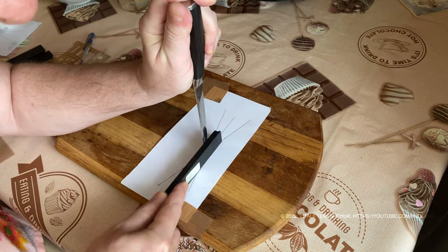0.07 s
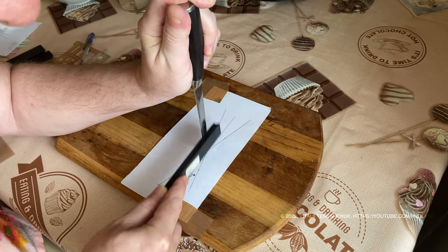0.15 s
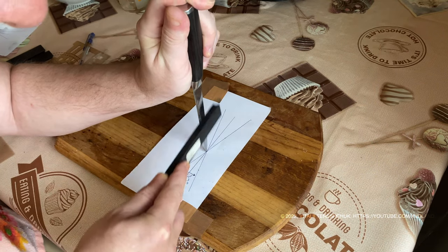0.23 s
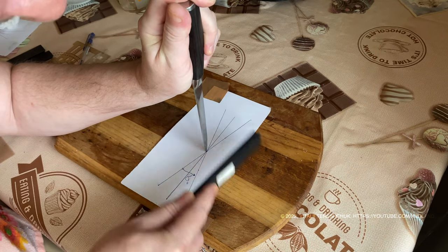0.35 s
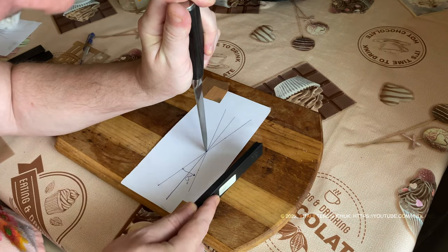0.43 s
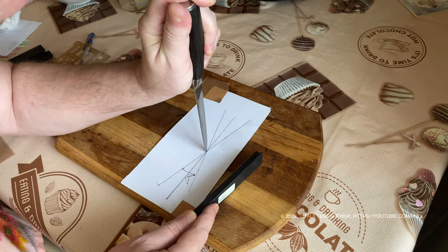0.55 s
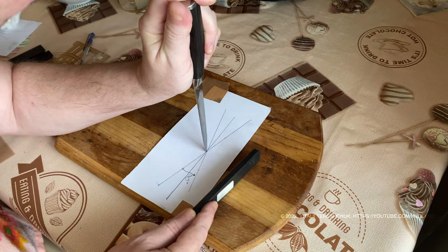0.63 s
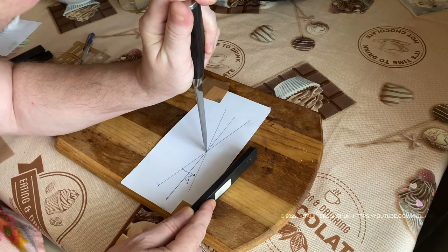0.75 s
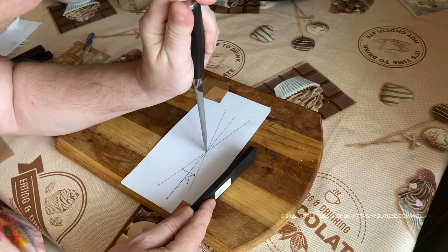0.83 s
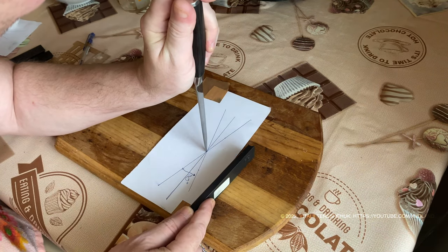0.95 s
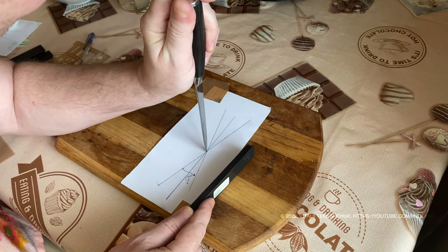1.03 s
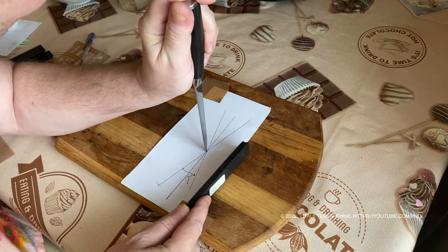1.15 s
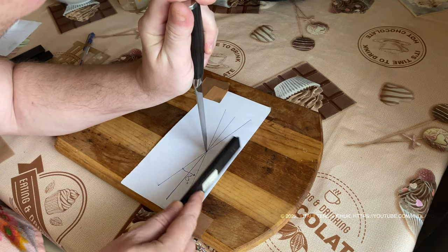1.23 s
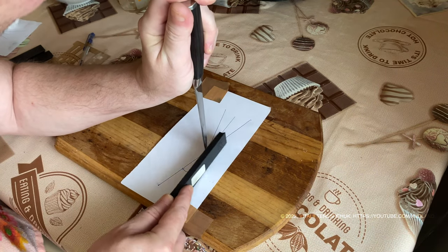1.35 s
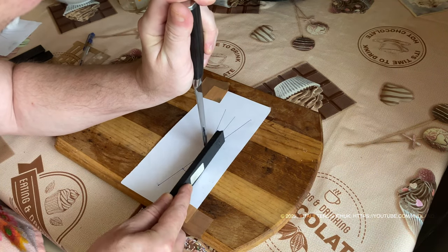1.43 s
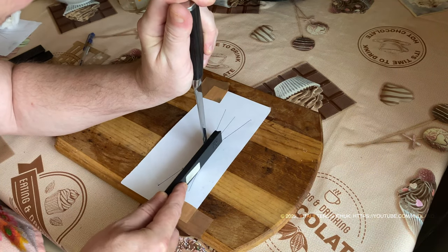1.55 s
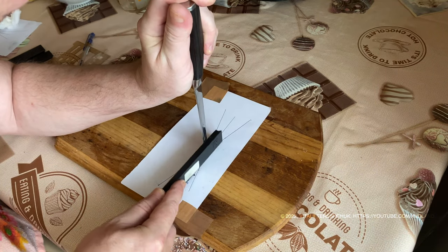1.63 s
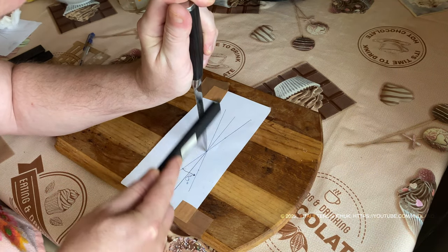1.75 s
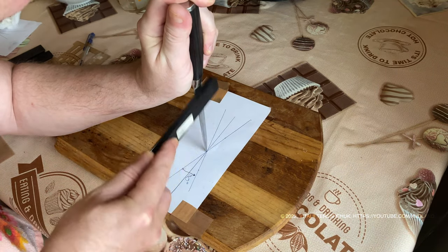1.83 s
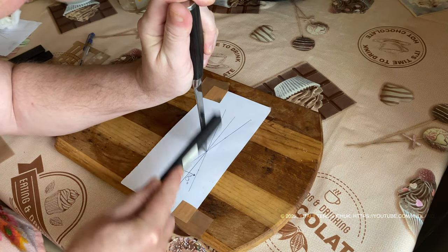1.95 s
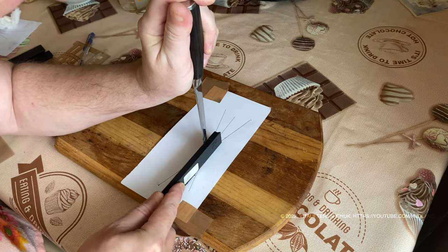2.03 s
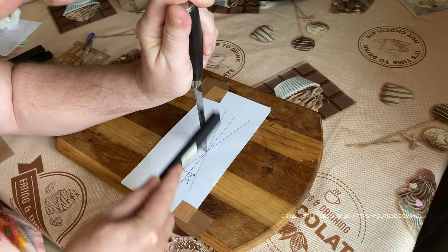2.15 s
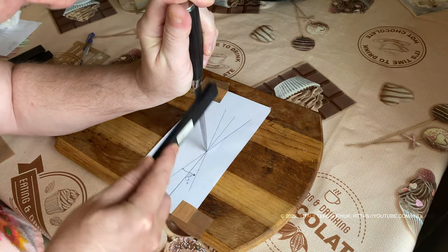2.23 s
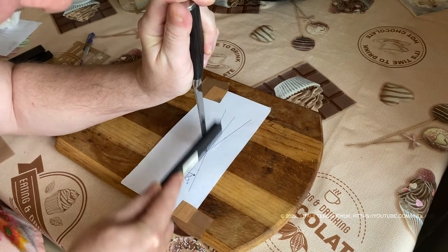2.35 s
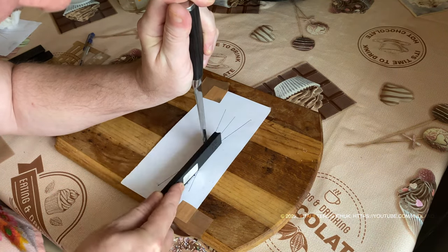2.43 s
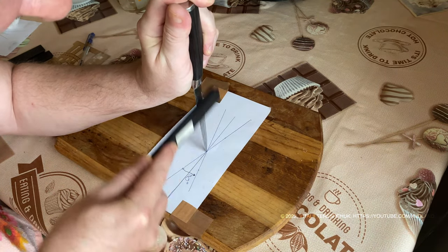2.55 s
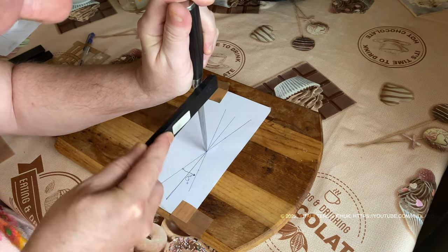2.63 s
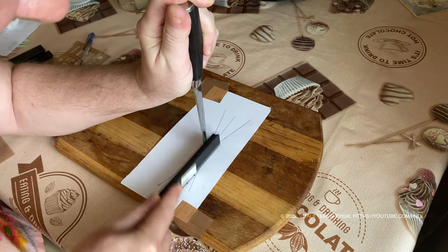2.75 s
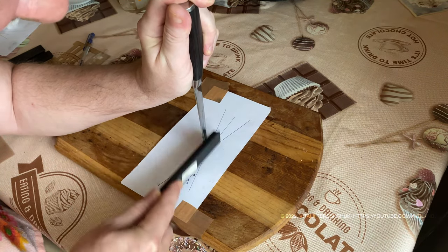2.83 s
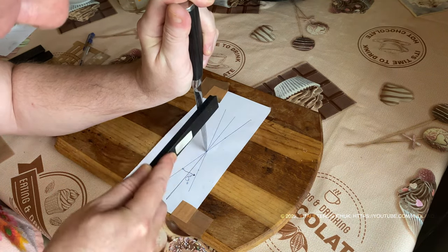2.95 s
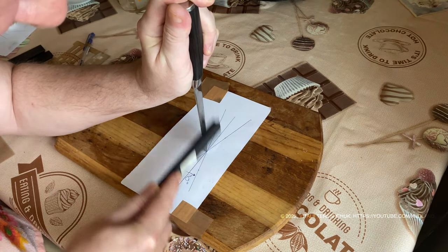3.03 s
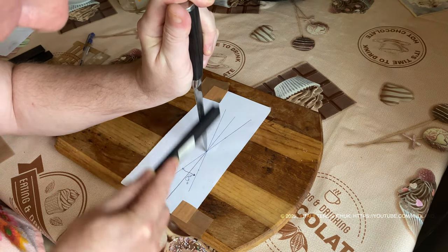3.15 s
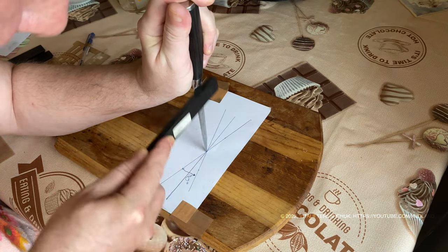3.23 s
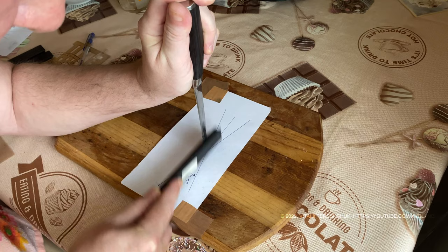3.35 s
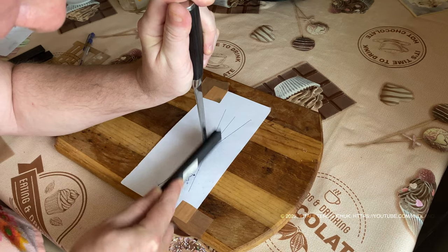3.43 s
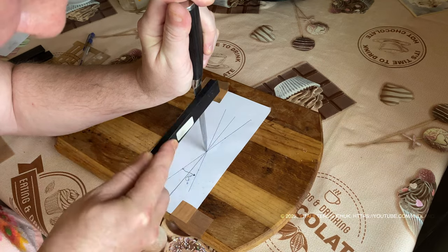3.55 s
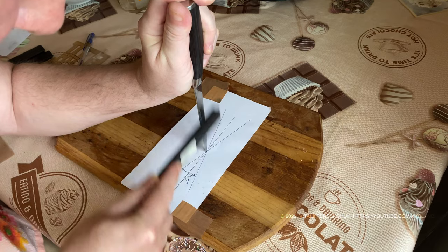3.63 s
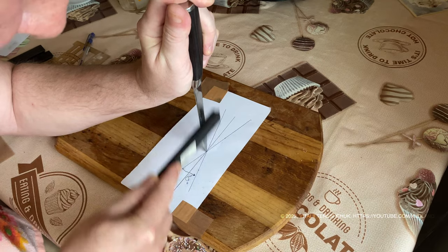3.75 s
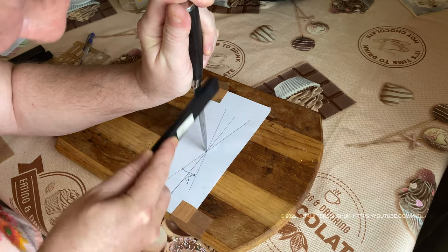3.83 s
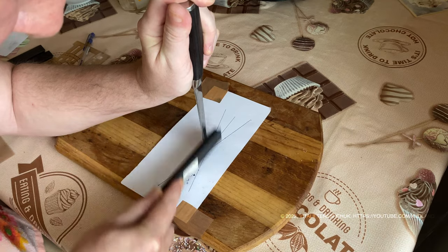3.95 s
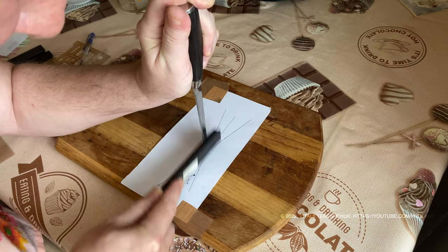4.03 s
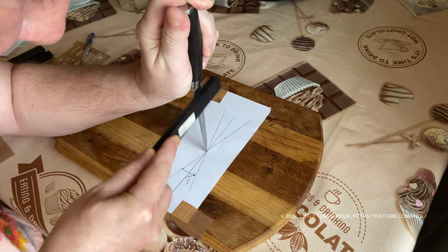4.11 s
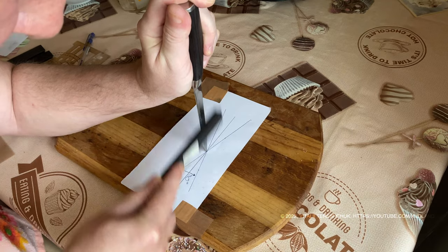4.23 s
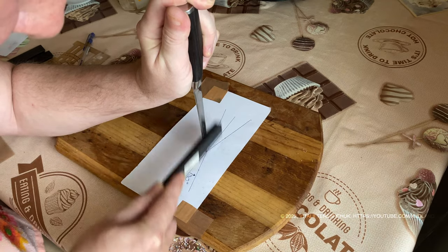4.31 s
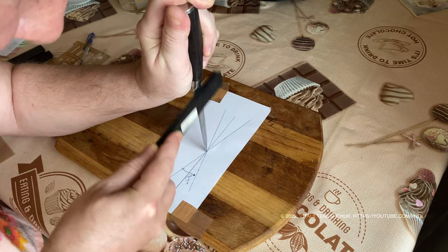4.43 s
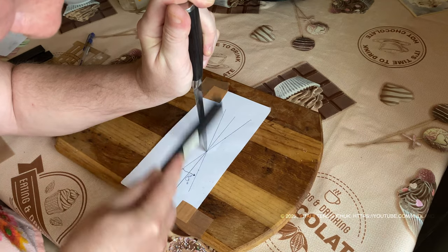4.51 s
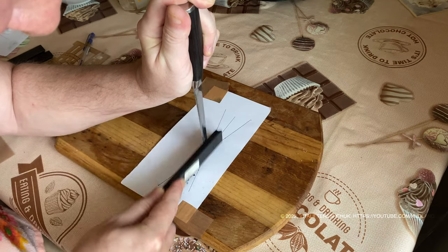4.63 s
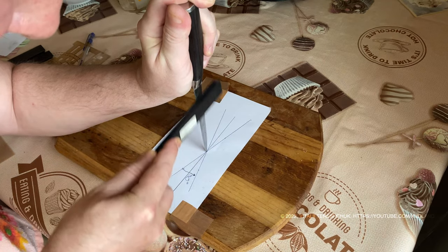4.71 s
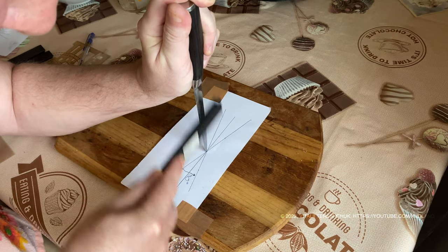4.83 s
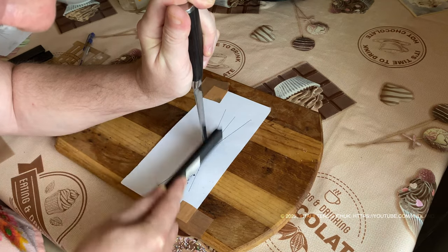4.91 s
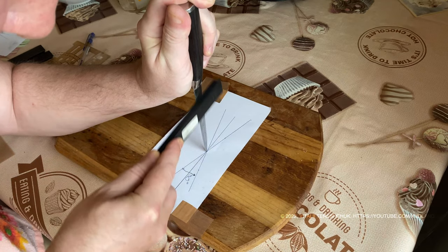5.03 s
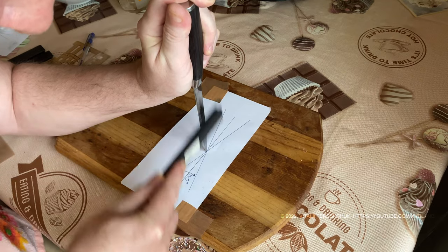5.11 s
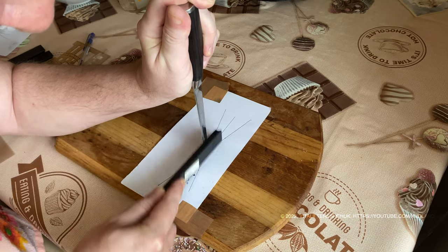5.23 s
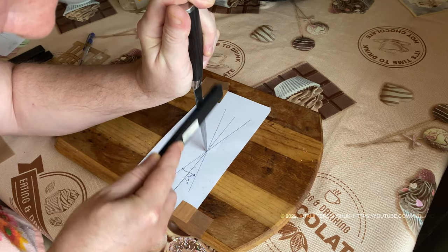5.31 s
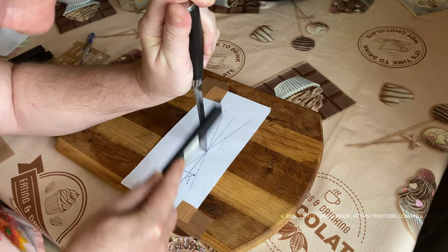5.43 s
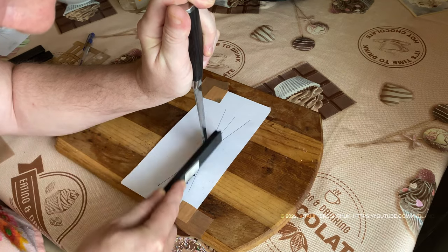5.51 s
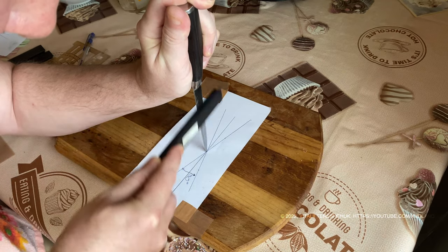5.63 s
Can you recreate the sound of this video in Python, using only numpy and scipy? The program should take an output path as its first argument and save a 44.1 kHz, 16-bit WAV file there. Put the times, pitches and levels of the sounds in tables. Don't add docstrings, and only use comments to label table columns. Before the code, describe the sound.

A gritty bar is worked along a steel blade whose tip rests on a wooden board. First two isolated knocks and a light brush, a pause, then a small touch and click; steady quick scraping follows to the end, bright hiss over low wooden rumble, punctuated by dry knocks about every 0.3 s. Softer taps come on some returns. Near stereo microphone, small room, light background air.

```python
import sys
import numpy as np
from scipy import signal
from scipy.fft import rfft, irfft, next_fast_len
from scipy.io import wavfile
from scipy.ndimage import uniform_filter1d

SR = 44100
rng = np.random.default_rng(int(sys.argv[2]) if len(sys.argv) > 2 else 0)


def wav_out(sig):
    wavfile.write(sys.argv[1], SR, np.round(np.clip(np.atleast_2d(sig).T, -1, 1) * 32767).astype(np.int16))


def natural_amplitude(level_db):
    exponent = np.asarray(level_db, float) / 20
    return 10 ** exponent


N = 250047

# (time [s], blow [dB], bar ring [dB], sharp tick [dB], dull side of the board [dB])
KNOCK_EVENTS = [(0.014, -9.5, -17.5, -20, -15.5), (0.484, -18.5, -33, -20.5, -7),
                (1.307, -26.5, 14.5, -47, 14), (1.445, -37, -21, -2, -20), (1.963, -6.5, -22.5, -18, -21),
                (2.348, -4, -28, -14, -26), (2.723, -1, -23.5, -16.5, -24.5),
                (3.012, -8, -11.5, -17, -13.5), (3.333, -6.5, -27, -18, -24),
                (3.634, -11.5, -16, -18.5, -14.5), (3.931, -11.5, -11, -18.5, -14),
                (4.224, -7, -18.5, -17.5, -11.5), (4.536, -10.5, -7.5, -16, -12.5),
                (4.829, -4.5, -18.5, -13.5, -16.5), (5.132, -14.5, -12, -20.5, -12),
                (5.438, -10, -4.5, -17, -7)]


def evened(x):
    return x / np.sqrt(np.mean(x ** 2) + 1e-20)


def smoothed(x, size):
    return uniform_filter1d(uniform_filter1d(x, size), size)


def read(points, hz):
    f, value = np.transpose(points)
    return np.interp(np.log(hz + 1), np.log(f + 1), value)


def coloured(x, gain):
    size = next_fast_len(x.shape[-1])
    return irfft(rfft(x, size) * gain(np.fft.rfftfreq(size, 1 / SR)), size)[..., :x.shape[-1]]


def add(mix, s, sound):
    part = mix[:, round(s * SR):][:, :sound.shape[1]]
    part += sound[:, :part.shape[1]]


def rings(modes, t, luck_db):
    out = 0 * t
    for (hz, db, t60_s), d in zip(modes, luck_db):
        out = out + natural_amplitude(db + d - 60 * t / t60_s) * np.sin(2 * np.pi * hz * t)
    return out


def peaks(modes, hz):
    return sum(natural_amplitude(db) / (1 + 2j * (hz - f) / width_hz) for f, width_hz, db in modes)


def resonate(x, hz, width_hz):
    turn = np.exp(2j * np.pi * np.cumsum(hz) / SR)
    r = np.exp(-np.pi * width_hz / SR)
    return 2 * (turn * signal.lfilter([1 - r], [1, -r], x / turn)).real


def alike(pair, same):
    def share(hz):
        return np.clip(read(same, hz), -1, 1)
    shared = coloured(pair[0], share)
    own = coloured(pair[1], lambda hz: np.sqrt(1 - share(hz) ** 2))
    return np.array([pair[0], shared + own])


def patchy(x, depth_db):
    z = signal.stft(x, nperseg=512, noverlap=384)[2]
    patches = uniform_filter1d(rng.standard_normal(z.shape[-2:]), size=6, axis=0)
    patches = evened(uniform_filter1d(patches, size=14, axis=1))
    return signal.istft(z * natural_amplitude(depth_db * patches), nperseg=512, noverlap=384)[1][..., :N]


def air():
    # (frequency [Hz], density [dB per Hz])
    air_spectrum = [(15, -43), (25, -10.5), (54, -10), (140, -12.5), (171, -14.5), (340, -15.5), (366, -18),
                    (1030, -15), (1190, -20.5), (1490, -22.5), (3120, -34.5), (4740, -29), (8500, -44),
                    (10500, -47), (12300, -91.5), (19800, -120)]
    # (frequency [Hz], left-right likeness [-1 to 1])
    air_same = [(90, 1), (250, 0.82), (400, 0.26), (600, -0.56), (1500, -0.41), (4000, -0.11),
                (8000, -0.016)]
    # (time [s], floor level [dB])
    hush = [
        (0, 1),
        (1.47, -2),
        (1.57, -7),
        (1.9, -8.5),
        (2.3, 4),
        (5.67, 0),
    ]
    pair = alike(rng.standard_normal((2, N)), air_same)
    pair = np.array([patchy(channel, 1.2) for channel in pair])
    hush_db = np.interp(np.arange(N) / SR, *np.transpose(hush))
    return natural_amplitude(-60 + hush_db) * evened(coloured(pair, lambda hz: natural_amplitude(read(air_spectrum, hz))))


def room(x):
    # (frequency [Hz], decay t60 [s])
    room_t60 = [(100, 0.584), (300, 0.47), (700, 0.27), (1800, 0.24), (5000, 0.23), (11000, 0.062)]
    # (frequency [Hz], left-right likeness [-1 to 1])
    room_same = [(60, .97), (250, .65), (500, .1), (1500, .35), (4000, .05), (8000, .6), (10000, .95),
                 (12000, .7)]
    echoes = np.zeros((2, SR // 2))
    at = np.arange(300, SR // 2 - 20, 20) + rng.integers(0, 20, (2, (SR // 2 - 301) // 20))
    np.put_along_axis(echoes, at, rng.choice([-1., 1.], at.shape), 1)
    hz, t, z = signal.stft(alike(echoes, room_same), SR, nperseg=256)
    decay = natural_amplitude(-60 * t / read(room_t60, hz)[:, None])
    tail = signal.istft(z * decay, SR, nperseg=256)[1]
    tail = tail / np.linalg.norm(tail, axis=1, keepdims=True)
    return signal.fftconvolve(x[None], tail, axes=1)[:, :N]


def chattered(ring, strengths, luck):
    chatter = np.zeros(500)
    contacts_s = np.abs([0, .0013, .0031, .0052, .0082] + .00015 * luck[:5])
    chatter[np.round(contacts_s * SR).astype(int)] = strengths
    push = np.convolve(chatter, signal.windows.hann(14))
    return signal.oaconvolve(ring, np.diff(push))[:len(ring)]


def tap(db, luck):
    # (frequency [Hz], level [dB], decay t60 [s])
    handle_modes = [(597, 3, 0.045), (740, 5, 0.061), (776, 5.5, 0.028), (831, 9.5, 0.041),
                    (890, -40, 0.025), (1285, 5, 0.022), (1442, -1.5, 0.066), (1670, -9, 0.11),
                    (2000, -39, 0.024), (2600, -33, 0.046)]
    ring = rings(handle_modes, np.arange(SR // 4) / SR, 1.6 * luck)
    wood = chattered(ring, [0.23, 0.81, 0.33, 0.028, 0.14], luck)
    wood = coloured(wood, lambda hz: 1 / (1 + 1j * hz / 1900) ** 2)
    return natural_amplitude(db + 4.5) * np.array([wood / abs(wood).max(), 0 * wood])


def knock(blow_db, bar_db, tick_db, dull_db, luck):
    # (frequency [Hz], level [dB], decay t60 [s])
    board_modes = [(576, -27, 0.051), (594, -23.5, 0.041), (700, -23.5, 0.042), (840, -6, 0.018),
                   (852, 13, 0.032), (925, 8.5, 0.029), (930, -27, 0.0034), (1093, -18.5, 0.024),
                   (1247, 0, 0.033), (1340.4, 7.5, 0.021), (1552, -54, 0.0083), (1812, -15.5, .03),
                   (1968, -8, 0.015), (2236, -39.5, 0.0055), (2640, -59.5, 0.016), (2556, -16.5, 0.0065)]
    # (frequency [Hz], level [dB], decay t60 [s])
    bar_modes = [(1469, 0, .105), (1506, -7, .06)]
    # (frequency [Hz], level [dB], decay t60 [s])
    table_modes = [(70.8, 0, 0.2), (57.8, -16, 0.059), (91, -3, 0.21), (114.4, 4.5, 0.1), (179.8, -9, 0.36),
                   (220.2, 0, 0.12), (305.3, -1.5, 0.058), (376, -2, 0.032)]
    # (frequency [Hz], density [dB per Hz])
    tick_spectrum = [(1500, -30.5), (2500, -12), (3000, -10.5), (4200, -4), (5200, -13.5), (7000, -20),
                     (9000, -16), (11500, -31.5), (12800, -42.5), (16000, -86.5)]
    t = np.arange(SR // 3) / SR
    noise = rng.standard_normal(len(t))
    waver = natural_amplitude(3.0 * evened(smoothed(noise, 200)))

    count = len(board_modes)
    modes = np.array(board_modes)
    low = 1 / (1 + np.exp((modes[:, 0] - 976) / 400))
    modes[:, 0] *= 1 + .02 * luck[-count:]
    board = waver * rings(modes, t, 2.6 * luck[:count] + 1.77 * (dull_db + 10.5) * low)
    wood = chattered(board, [.35, .85, 1., .6, .3], luck)

    grip = natural_amplitude(-450 * np.maximum(t - .035, 0))
    bar = waver[::-1] * rings(bar_modes, t, luck) * grip
    wood += natural_amplitude(bar_db + 17.5) * chattered(bar, [0, 1., 0, 0, 0], luck)

    burst = noise * natural_amplitude(-60 * t / 0.027) * np.minimum(t / 0.0019, 1)
    tick = coloured(burst, lambda hz: natural_amplitude(read(tick_spectrum, hz))) * (t < t[-1] / 2)
    sharp = wood / abs(wood).max() + natural_amplitude(tick_db + 4.5) * tick / abs(tick).max()

    thump = 0 * t
    for mode, d in zip(table_modes, luck[::-1]):
        build = 1 - np.exp(-(t * mode[0] / 1.15) ** 2)
        thump += rings([mode], t, [2.0 * d]) * build
    thump_db = -30 - 0.44 * min(dull_db + 14, 0)
    return natural_amplitude(blow_db + 1.0) * np.array([sharp, natural_amplitude(thump_db) * thump])


def knocks():
    # (time [s], level [dB])
    tap_events = [
        (1.802, -37),
        (2.548, -19),
        (3.195, -25),
        (4.126, -43.5),
        (4.397, -23.5),
        (5.354, -43),
        (2.715, -25),
        (3.925, -32),
        (5.126, -40),
    ]
    out = np.zeros((2, N))
    luck = rng.standard_normal((len(KNOCK_EVENTS) + len(tap_events), 24))
    for (s, *blow), row in zip(KNOCK_EVENTS, luck):
        add(out, s - .0015, knock(*blow, row))
    for (s, db), row in zip(tap_events, luck[len(KNOCK_EVENTS):]):
        add(out, s - .0015, tap(db, row))
    return out


def arch(t, start_s, length_s, top):
    u = np.clip((t - start_s) / length_s, 0, 1)
    return np.sin(np.pi * u ** (np.log(.5) / np.log(top))).clip(0)


def hand():
    # (start [s], length [s], top speed [dB], pressure [dB])
    pushes = [(-.06, .09, -50.5, -44.5), (1.55, 0.17, -61.5, -61.5), (1.84, 0.14, -50.5, -54),
              (2.22, .15, -50.5, -57.5), (2.6, 0.13, -48.5, -61), (2.93, 0.1, -46, -48),
              (3.23, .13, -47.5, -50.5), (3.52, 0.14, -51, -54.5), (3.81, 0.15, -49.5, -55.5),
              (4.11, .15, -48, -52.5), (4.43, 0.12, -48, -52.5), (4.73, 0.13, -43.5, -53.5),
              (5.02, 0.13, -47.5, -54.5), (5.33, .14, -47, -53.5), (5.64, .14, -46, -50)]
    # (start [s], length [s], top speed [dB], pressure [dB])
    pulls = [(1.69, 0.13, -58, -65.5), (2.04, 0.19, -55.5, -71), (2.4, 0.22, -55, -63),
             (2.77, 0.14, -56.5, -60), (3.05, 0.17, -53.5, -54), (3.37, .15, -53, -59.5),
             (3.66, .15, -49.5, -62.5), (3.96, 0.16, -48.5, -55), (4.27, 0.14, -46.5, -54.5),
             (4.58, 0.14, -50.5, -54), (4.87, 0.14, -49.5, -58.5), (5.18, 0.13, -49, -57.5),
             (5.47, .17, -52, -58.5)]
    # (start [s], length [s], top speed [dB], rasp [dB])
    brushes = [
        (0.119, 0.18, -51, -52.5),
        (0.218, 0.2, -78, -82),
        (1.177, 0.15, -76, -73),
        (1.294, .1, -65.5, -85),
        (1.431, 0.12, -55, -63),
    ]
    t = np.arange(0, N + 64, 64) / SR
    touching = np.clip((t - 1.58) / .06, 0, 1)
    fizz, rasp, rumble = (natural_amplitude(rest_db) * touching for rest_db in (-72.5, -76.5, -62))
    moving = 0 * t
    for strokes, top in ((pushes, 0.59), (pulls, 0.39)):
        for start_s, length_s, speed_db, pressure_db in strokes:
            speed = arch(t, start_s, length_s, top)
            fizz = fizz + natural_amplitude(speed_db) * speed ** 0.99
            rasp = rasp + natural_amplitude(-55.5 + 0.78 * (speed_db + 50)) * speed ** 0.64
            rumble = rumble + natural_amplitude(pressure_db) * speed
            moving = moving + speed
    for start_s, length_s, speed_db, rasp_db in brushes:
        speed = arch(t, start_s, length_s, 0.14) ** 4.5
        fizz = fizz + natural_amplitude(speed_db) * speed
        rasp = rasp + natural_amplitude(rasp_db) * speed
    for s, blow_db, *_ in KNOCK_EVENTS:
        rattle = natural_amplitude(blow_db - 60 * abs(t - s) / 0.44) * (t > s)
        fizz = fizz + natural_amplitude(-61) * rattle
        rasp = rasp + natural_amplitude(-50.5) * rattle
        rumble = rumble + natural_amplitude(-56.5) * rattle
    edge_hz = 10300 + 200 * moving
    return [np.interp(np.arange(N) / SR, t, v) for v in (fizz, rasp, rumble, edge_hz)]


def scrape():
    # (frequency [Hz], density [dB per Hz])
    grit_spectrum = [(1060, -32), (1800, -13), (1890, -4), (2250, -8.5), (2830, -8.5), (5130, -4.5),
                     (5710, -10), (6350, -4), (7310, -1.5), (8270, 2.5), (9130, -4.5), (10800, 2.5),
                     (12000, -11), (12300, -14), (12900, -80.5), (16800, -108), (22000, -120)]
    # (frequency [Hz], width [Hz], level [dB])
    blade_modes = [(3860, 126, 9.5), (4610, 130, 6), (6500, 200, 5.5), (7440, 100, 1.5), (10100, 100, -17),
                   (11550, 40, -2)]
    # (frequency [Hz], width [Hz], level [dB])
    hum_modes = [(586, 31, 3), (741, 170, 3.5), (826, 23, 2), (855, 17, -24), (1258, 86, -4.5),
                 (1437, 70, -4.5), (1820, 230, -24.5)]
    fizz_level, rasp_level, rumble_level, edge_hz = hand()
    flutter = evened(smoothed(rng.standard_normal((2, N)), 400))
    size_db = 1.2 * np.minimum(rng.exponential(1, (2, N)), 4)
    caught = rng.random((2, N)) < 12000 / SR
    grains = rng.standard_normal((2, N)) * natural_amplitude(size_db) * caught

    def steel_gain(hz):
        return natural_amplitude(read(grit_spectrum, hz)) * (1 + 0.61 * peaks(blade_modes, hz))

    def board_gain(hz):
        return (peaks(hum_modes, hz) + natural_amplitude(-39)) / (1 + (480 / (hz + 1)) ** 8) * (hz < 2500)

    hiss = patchy(coloured(grains[0], steel_gain), 3.4)
    fizz = coloured(hiss, lambda hz: hz > 8300)
    rasp = evened(hiss - fizz)
    fizz = coloured(fizz, lambda hz: 1 / (1 + (hz / 12000) ** 60))
    fizz = evened(fizz + 0.22 * resonate(fizz, edge_hz, 250))
    rumble = evened(coloured(grains[1], board_gain))
    steel = natural_amplitude(2.2 * flutter[0]) * (fizz_level * fizz + rasp_level * rasp)
    return steel + natural_amplitude(2.77 * flutter[1]) * rumble_level * rumble


def scene():
    # (frequency [Hz], left lead [rad])
    port_rad = [(150, 0), (600, .35), (1500, .3), (2800, 1.7), (4200, 2.2), (5400, .8), (6500, -1.2),
                (7400, -1.2), (7950, -2.8), (8500, -3.4), (9000, -4.6), (9600, -5.8), (10500, -6.28)]
    # (frequency [Hz], left over right [dB])
    port_db = [(200, 0.5), (550, 2.5), (1000, 0.5), (1500, 0), (2600, 1.5), (5500, 5.5), (7500, 2.5),
               (9000, 1.5)]
    blows, booms = knocks()
    grit = scrape()
    echoes = room(natural_amplitude(-7.5) * blows + natural_amplitude(-3.5) * grit + natural_amplitude(-16.0) * booms)
    near = blows + booms + grit + patchy(echoes, 4.0)
    side = np.array([[.5], [-.5]])

    def ports(hz):
        return natural_amplitude(side * read(port_db, hz)) * np.exp(1j * side * read(port_rad, hz))

    return coloured(near, ports) + air()


def top_cut(x):
    return signal.sosfilt(signal.butter(12, 13060, fs=SR, output="sos"), x)


def record(dry):
    cut = signal.sosfilt(signal.butter(N=2, Wn=40, btype="high", fs=SR, output="sos"), dry)
    over = np.maximum(abs(cut) - .6, 0)
    soft = cut - np.sign(cut) * (over - .33 * np.tanh(over / .33))
    return top_cut(soft)


dry = scene()
out = record(dry)
wav_out(out)
```